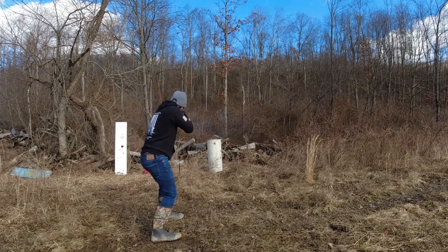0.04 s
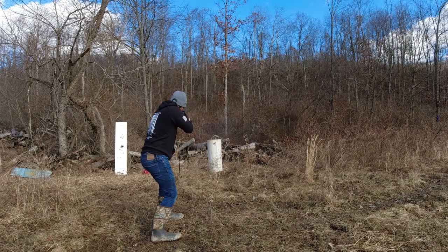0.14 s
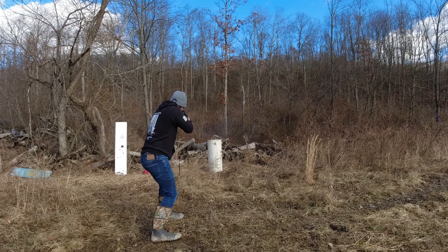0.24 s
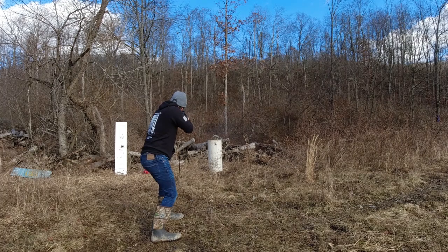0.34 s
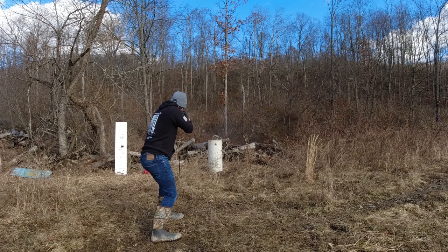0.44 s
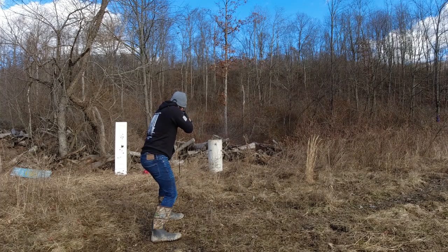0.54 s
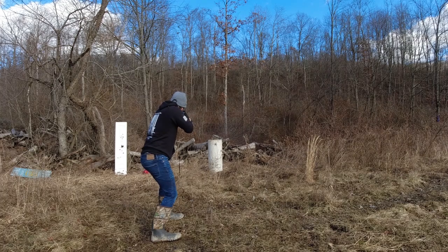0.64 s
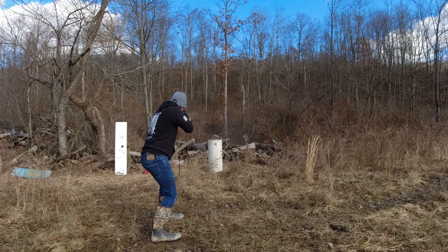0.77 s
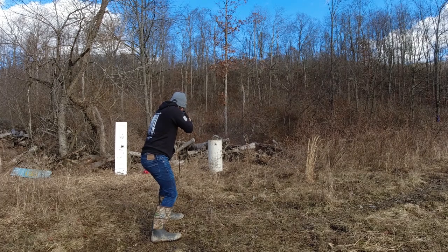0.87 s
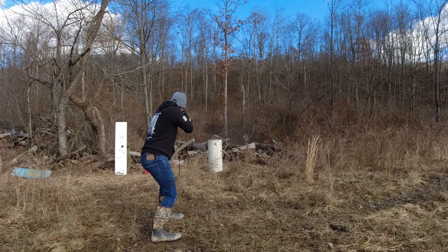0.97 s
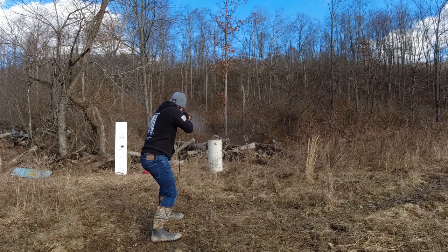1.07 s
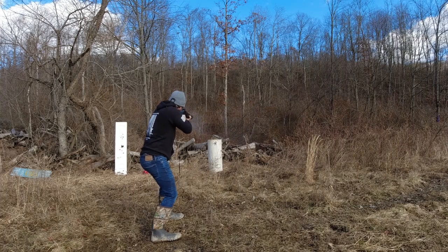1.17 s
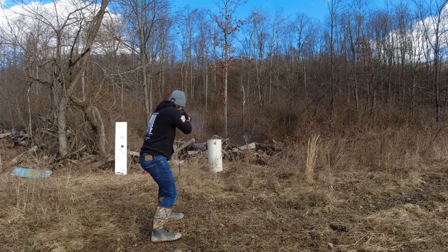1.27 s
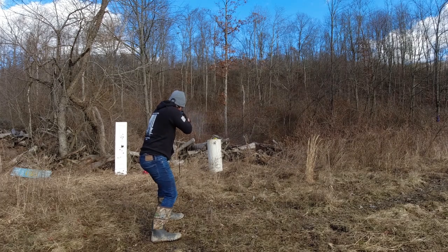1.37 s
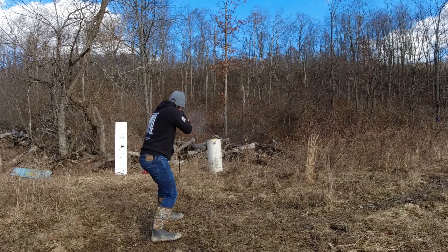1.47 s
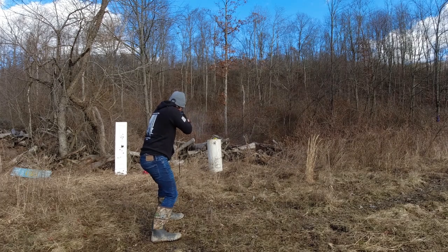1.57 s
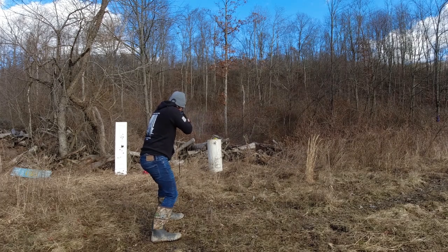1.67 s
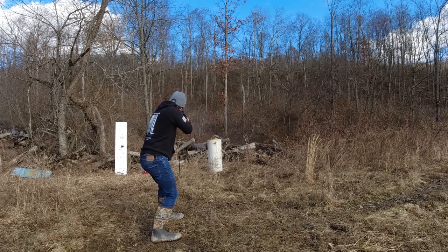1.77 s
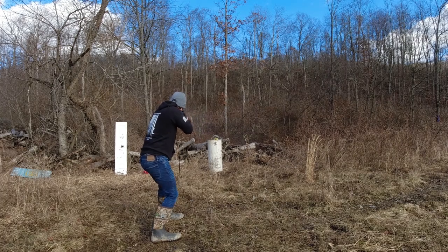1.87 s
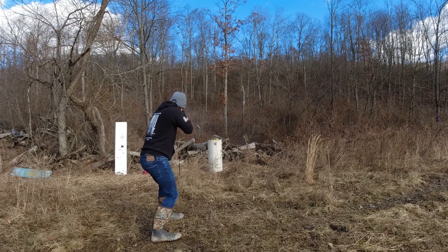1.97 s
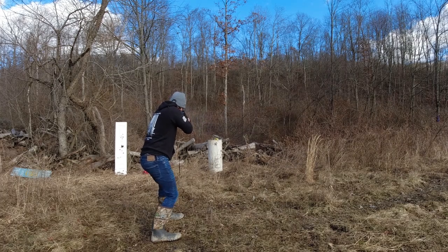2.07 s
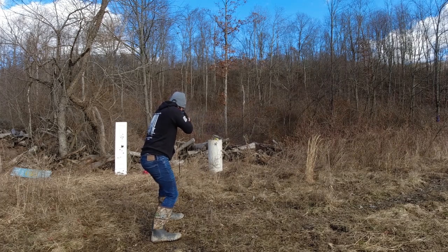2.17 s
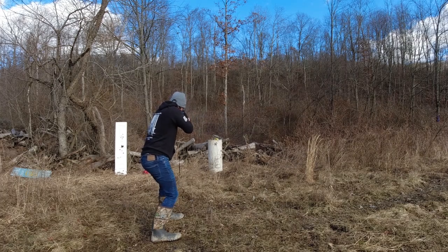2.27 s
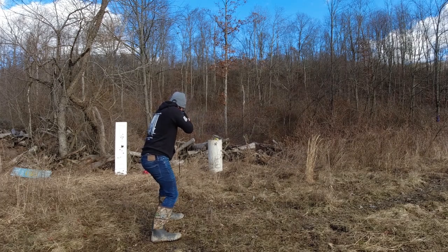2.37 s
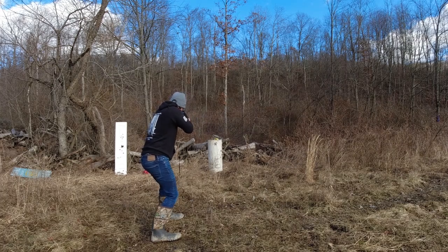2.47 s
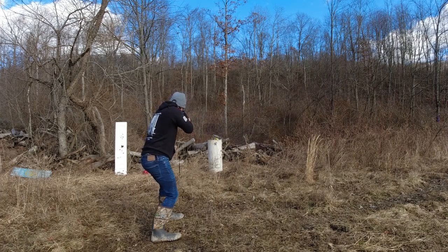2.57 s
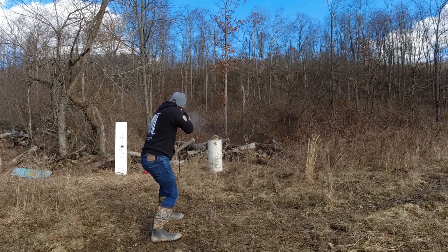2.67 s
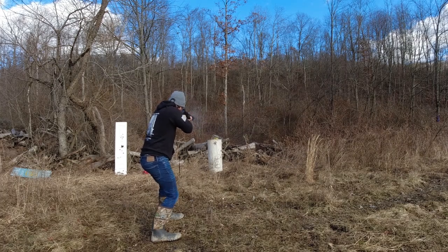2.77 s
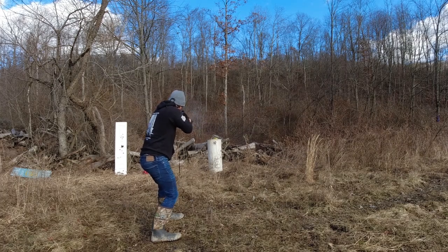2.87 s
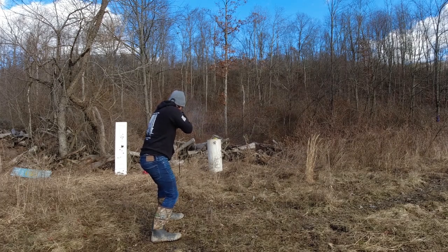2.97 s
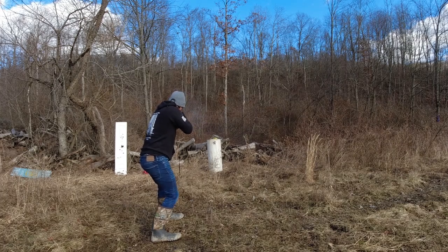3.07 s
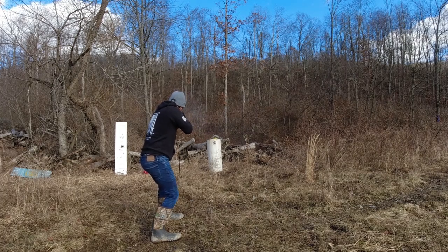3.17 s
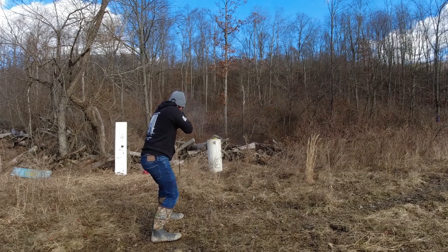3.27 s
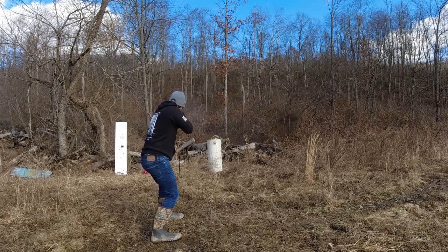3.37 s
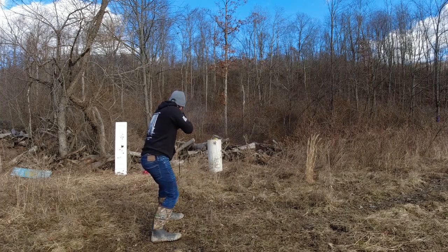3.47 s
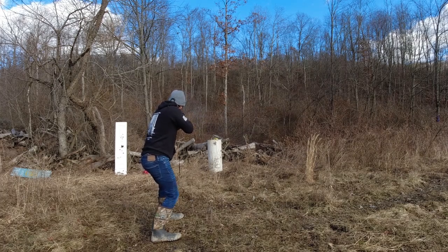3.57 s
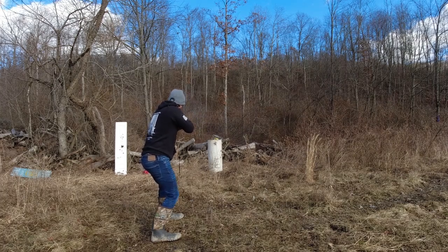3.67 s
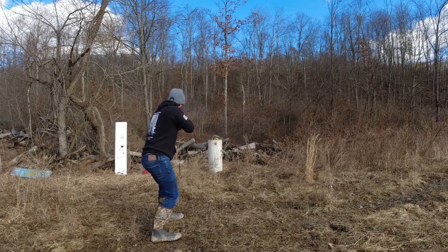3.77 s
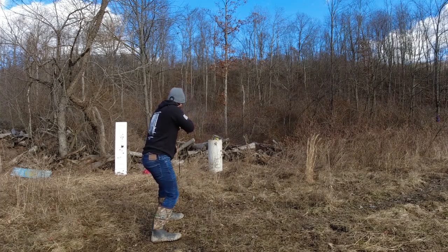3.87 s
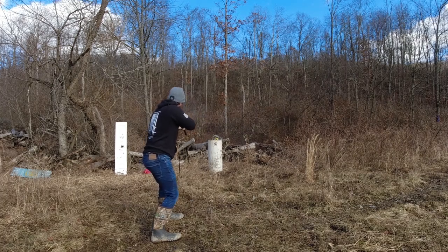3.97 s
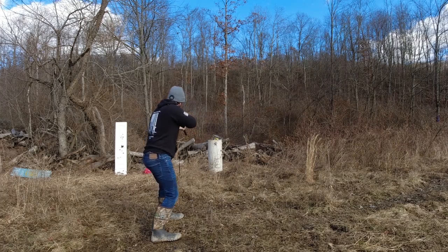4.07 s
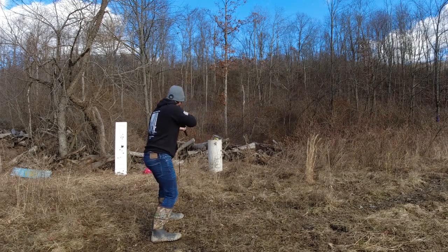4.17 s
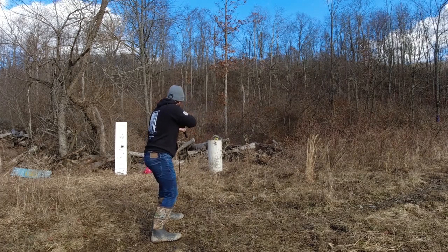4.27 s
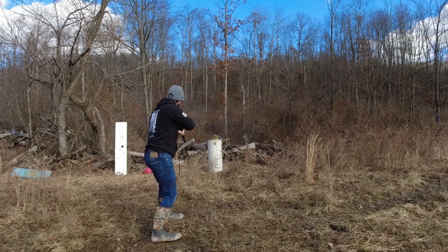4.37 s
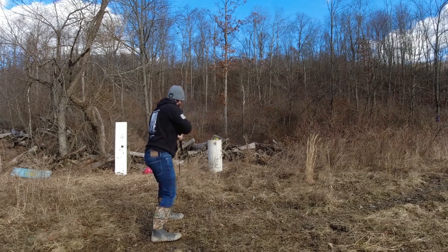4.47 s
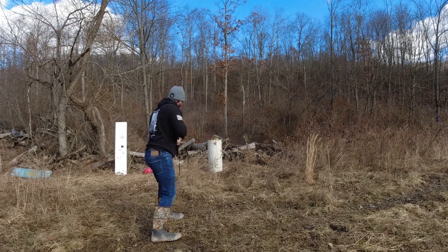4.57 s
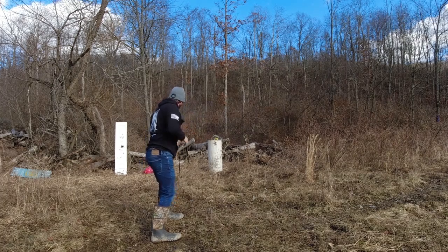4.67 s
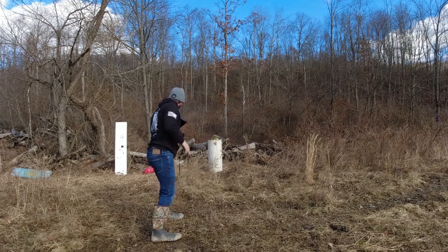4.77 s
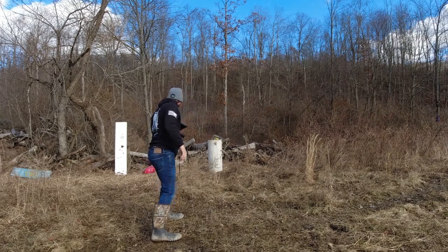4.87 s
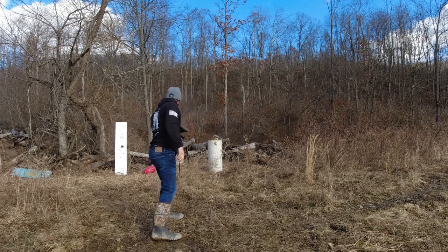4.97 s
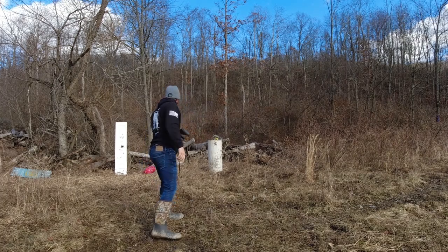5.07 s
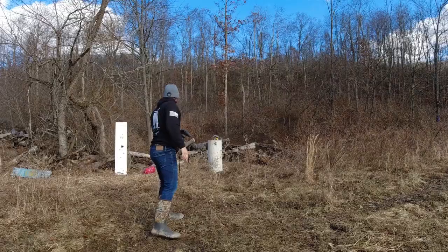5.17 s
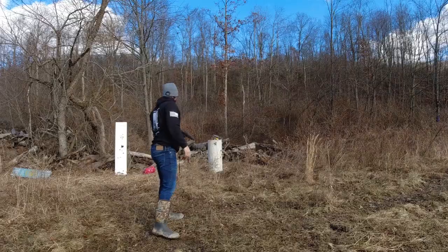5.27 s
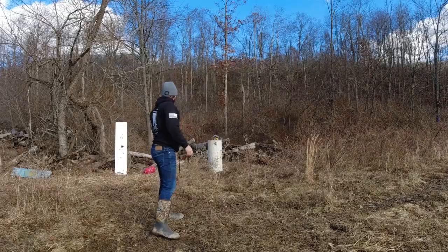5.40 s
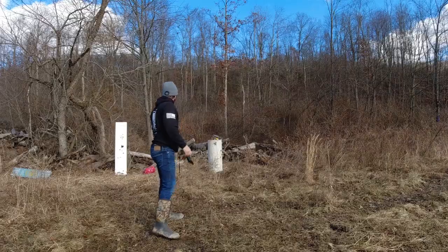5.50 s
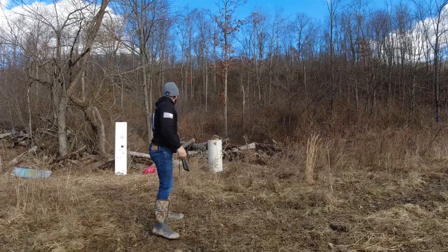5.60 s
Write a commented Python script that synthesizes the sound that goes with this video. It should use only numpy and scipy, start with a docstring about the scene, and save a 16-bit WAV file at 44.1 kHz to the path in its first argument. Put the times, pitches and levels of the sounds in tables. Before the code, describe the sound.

A pump-action shotgun is racked and fired twice outdoors, each boom rolling off the woods, then the slide is pulled open.

```python
"""A clearing faces a wooded bank; a pump-action shotgun is fired, its first shot already rolling away.
Each blast is a shock front and a low boom that overload the microphone. Targets and trunks reflect it
as distinct slaps, and the wood scatters it into a dying wash. The slide is racked between shots and
pulled open after the last: impact and friction excite the resonances of receiver and barrel.
Underneath lie the shooter's soft footfalls, a far engine, a faint hum and the hush of the open air."""
import sys
import numpy as np
from scipy import signal
from scipy.fft import rfft, irfft, next_fast_len
from scipy.io import wavfile
from scipy.ndimage import uniform_filter1d

SR = 44100
rng = np.random.default_rng(int(sys.argv[2]) if len(sys.argv) > 2 else 0)


def pcm_store(signal):
    """Save signal as 16-bit PCM."""
    levels = np.round(np.clip(np.atleast_2d(signal), -1, 1) * 32767)
    wavfile.write(sys.argv[1], SR, levels.astype(np.int16).T)


N = 248721
TIME = np.arange(N) / SR
AGE = TIME[:round(1.2 * SR)]   # time since the onset of one event

# left-right coherence of diffuse and of direct sound: (f/Hz, correlation)
FAR_COHERENCE = [(130, 0.99), (290, .99), (640, 0.95), (1400, 0.74), (3100, 0.32), (6800, .1),
                 (15000, 0.22)]
NEAR_COHERENCE = [(130, 1), (640, 0.95), (1400, .86), (3100, 0.56), (6800, 0.13), (15000, .15)]
# spectra of the outdoor hush and rumble: (f/Hz, relative density/dB)
HUSH_SPECTRUM = [(60, -29), (120, -5.5), (200, -4), (290, -4.5), (450, -6), (800, -5), (1100, -9),
                 (1600, -17.5), (2200, -27.5), (3500, -42), (6000, -54), (10000, -57), (16000, -69)]
RUMBLE_SPECTRUM = [(12, -4.5), (28, -4), (48, -13), (95, -8), (150, -19.5), (400, -59.5)]
# load on the far engine: (t/s, load from 0 to 1)
ENGINE_LOAD = [(0, 0), (2.4, .55), (3.6, .2), (4.3, .66), (4.7, .72), (5.35, 1)]
# thuds as the shooter shifts his weight: (t/s, level/dB, f/Hz)
THUDS = [(1.153, -45, 109), (2.719, -44, 104), (4.377, -39.5, 101)]

# hands and sleeves brush the lowered gun: (t of peak/s, level/dB, swell and decay time/s)
HANDLING = [(4.515, -80, .016), (4.73, -85, .014), (5.34, -79, .04)]
# a loose part clicks: (t/s, level/dB, rattle time/s, low-mode weight/dB)
LOOSE_PART_TICK = (4.4625, -66, .004, -4)
# slide pulled back: (t of rear stop/s, level/dB, relative level of the tumbling shell/dB)
PULLS = [(0.4194, -23, -13), (1.9684, -23.3, -19), (3.9587, -21.3, -40)]
# slide pushed home: (t of front stop/s, level/dB)
PUSHES = [(0.6564, -26.3), (2.223, -24.3)]
# contacts in a stroke: (t from the stop/s, relative level/dB, rattle time/s, low-mode weight/dB)
PULL_CONTACTS = [(-.0355, -15.5, .0052, -13), (-.0063, -17, .004, 1), (0, 0, .0046, -3),
                 (.0125, -17.5, .004, -2)]   # bolt unlocks, ejector trips, rear stop, rebound
PUSH_CONTACTS = [(-.094, -21, .009, -3), (-.0467, -15, .007, -8), (-.0075, -6.5, .0034, -8),
                 (0, 0, .004, -6.5)]   # lifter rises, shell meets chamber, bolt closes, front stop
# friction as the slide speeds towards a stop: (relative level/dB, swell time/s, decay time/s)
PULL_RUB = (-17, .017, .005)
PUSH_RUB = (-17, .028, .008)
# normal modes of receiver and barrel: (f/Hz, bandwidth/Hz, level/dB)
GUN_MODES = [(310, 42, -6), (464, 74, -5.5), (900, 68, 1), (1220, 113, -.5), (1504, 106, -2),
             (1798, 100, -1.5), (2277, 160, .3), (2746, 133, -1), (2940, 130, -2), (3160, 220, -1.5),
             (4030, 730, -14.5), (4600, 130, -8.5), (5240, 1100, -17.5), (8000, 2200, -19.5),
             (10660, 1500, -16), (14000, 2500, -25)]
# spectrum of their scatter from nearby brush: (f/Hz, relative density/dB)
BRUSH_SPECTRUM = [(200, 0.5), (900, 0), (3200, -4), (5000, -7.5), (7000, -9), (10500, -8.5), (16000, -16)]

# dense stands of brush and trees that return the blast: (delay/s, level/dB)
THICKETS = [(.06, -13), (.12, -17)]
# ground, targets and trunks that answer every shot alike: (delay/s, level/dB, decay time/s)
REFLECTORS = [(.029, -3.5, .0036), (.0455, -5.5, .005), (.0545, -7.5, .012), (.1015, -9.5, .0026),
              (.1149, -5, .004), (.122, -4, .0022), (.127, -12, .004), (.138, -13, .0045),
              (.158, -16, .002), (.2045, -16, .0016), (.223, -17, .0018), (.2437, -23, .0026),
              (.331, -30, .004)]
# spectra of the parts of a shot: (f/Hz, relative density/dB)
WOODS_SPECTRUM = [(25, -20), (70, -7.5), (140, -4.5), (280, -4), (480, -2), (750, 2), (1000, 1.5),
                  (1350, -6), (2000, -6.5), (3100, -11), (4000, -17.5), (6800, -25.5), (10500, -19),
                  (16000, -28)]
SLAP_SPECTRUM = [(40, -12), (200, 3), (500, -2), (750, -2), (1020, 4), (1450, -6.5), (2000, -5.5),
                 (2550, -11), (3200, -5), (4000, -20.5), (7000, -29.5), (11000, -31.5), (16000, -35)]
SIZZLE_SPECTRUM = [(40, -7.5), (150, -6.5), (300, -2), (1000, -2.5), (2200, 4.5), (3400, 1.5), (5000, -5),
                   (7500, -10.5), (11000, -5.5), (16000, -14.5)]
CRACK_SPECTRUM = [(60, -33), (300, -19.5), (600, -10), (950, 0), (1900, -1.5), (3200, -6.5), (4500, -15.5),
                  (7000, -25), (11000, -17), (16000, -21)]
# the overloaded microphone swings back to rest: (t/s, amplitude, first half swing/s, decay time/s)
RECOVERY_SWINGS = [(1.232, 0.87, .039, 0.11), (2.846, -0.28, .02, .028)]
# shots: (t/s, crack level/dB, sizzle level/dB, sizzle decay time/s, boom level/dB, woods level/dB)
SHOTS = [(-0.29, -10, -17, .065, 0, 2.3), (1.2023, -5.5, -15.5, 0.075, 0, 2.3),
         (2.8139, -6, -18, 0.08, -1.5, 1.5)]


def from_db(db):
    """Amplitude ratio of a level in decibels."""
    return 10 ** (np.asarray(db) / 20)


def unit_rms(x):
    """Normalisation to unit power."""
    return x / np.sqrt(np.mean(x ** 2) + 1e-20)


def at_hz(table, hz):
    """Interpolation of a table on a log-frequency axis."""
    f, value = np.transpose(table)
    return np.interp(np.log(np.maximum(hz, 1)), np.log(f), value)


def add(out, sound, onset):
    """Superposition of a sound at an onset in seconds, which may be negative."""
    at = round(onset * SR)
    first, last = max(at, 0), min(at + sound.shape[-1], N)
    out[..., first:last] += sound[..., first - at:last - at]


def coloured(x, spectrum):
    """Minimum-phase (causal) filtering that conserves the power of white noise."""
    size = 2 * next_fast_len(x.shape[-1])
    gain = unit_rms(from_db(at_hz(spectrum, np.linspace(0, SR / 2, size // 2 + 1))))
    cepstrum = irfft(np.log(gain))[:size // 2]
    cepstrum[1:] *= 2
    return irfft(rfft(x, size) * np.exp(rfft(cepstrum, size)))[..., :x.shape[-1]]


def stereo(pair, coherence):
    """Partial coherence: two independent signals mix to channels alike in bass, apart in treble."""
    size = 2 * next_fast_len(pair.shape[-1] // 2 + 1)
    mid, side = rfft(pair, size)
    alike = np.clip(at_hz(coherence, np.linspace(0, SR / 2, len(mid))), -.999, .999)
    channels = np.sqrt((1 + alike) / 2) * mid + np.sqrt((1 - alike) / 2) * side * [[1], [-1]]
    return irfft(channels)[:, :pair.shape[-1]]


def noise(spectrum, coherence, size):
    """Stationary stereo noise of a given spectrum."""
    return coloured(stereo(rng.standard_normal((2, size)), coherence), spectrum)


def fluctuation(size, window):
    """Random drift of unit power: a moving average of noise over a window of samples."""
    return unit_rms(uniform_filter1d(rng.standard_normal(size), size=window))


def swell_and_fade(t, swell, fade):
    """Exponential growth to 1 at t = 0, then exponential decay."""
    return np.exp(-np.maximum(-t / swell, t / fade))


def bursts(events, rise_s):
    """Incoherent addition: the envelopes of events (t/s, level/dB, decay time/s) sum in power."""
    power, t = np.zeros(N), AGE[:SR // 8]
    for onset, db, decay in events:
        add(power, (from_db(db) * (1 - np.exp(-t / rise_s)) * np.exp(-t / decay)) ** 2, onset)
    return np.sqrt(power)


def pulses(events, gain_db, edge_hz, order):
    """Band-limited impulses: one at the onset of each event, blunted by a low-pass."""
    train = np.zeros(N)
    for onset, db, _ in events:
        train[round(onset * SR)] = from_db(db + gain_db)
    return signal.sosfilt(signal.butter(order, edge_hz, fs=SR, output="sos"), train + 1e-18)


def resonance(x, hz, width_hz):
    """Forced response of a damped oscillator with unit peak gain."""
    r = np.exp(-np.pi * width_hz / SR)
    feedback = [1, -2 * r * np.cos(2 * np.pi * hz / SR), r * r]
    return signal.lfilter(np.array([1, 0, -1]) * (1 - r * r) / 2, feedback, x + 1e-18)


def drone(hz, db, octave_db, waver):
    """Slight random frequency modulation of a tone and its octave."""
    phase = 2 * np.pi * np.cumsum(hz * (1 + waver * fluctuation(N, window=3000))) / SR
    return np.sqrt(2) * from_db(db) * (np.sin(phase) + from_db(octave_db) * np.sin(2 * phase))


def open_air(hush_db=-60, rumble_db=-60, hum_hz=270, hum_db=-64.5, hum_fade_db_per_s=2.1):
    """Ambient noise: a steady hush and rumble, with a distant hum that slowly fades."""
    hum = drone(hum_hz, hum_db - hum_fade_db_per_s * TIME, octave_db=-20, waver=.018)
    hush = from_db(hush_db) * noise(HUSH_SPECTRUM, FAR_COHERENCE, N)
    rumble = from_db(rumble_db) * noise(RUMBLE_SPECTRUM, FAR_COHERENCE, N)
    return hum + hush + rumble


def far_engine(idle_hz=76.2, sag_hz=3.5, idle_db=-67, load_db=16.7):
    """A periodic source that grows louder and slower under load."""
    load = np.interp(TIME, *np.transpose(ENGINE_LOAD))
    return drone(idle_hz - sag_hz * load, idle_db + load_db * load, octave_db=-19, waver=.015)


def footfalls(swell_s=.006, scuff_db=8, scuff_hz=290, scuff_width_hz=180):
    """Heavily damped impacts on soft ground: each a low knock with a dull scuff."""
    out = np.zeros(N)
    envelope = AGE / swell_s * np.exp(1 - AGE / swell_s)
    for onset, db, hz in THUDS:
        scuff = resonance(rng.standard_normal(len(AGE)), scuff_hz, scuff_width_hz)
        scuff = from_db(scuff_db) * resonance(scuff, scuff_hz, scuff_width_hz)
        add(out, from_db(db) * envelope * (np.sin(2 * np.pi * hz * AGE) + scuff), onset)
    return out


def slide_motion(shell_delay_s=.028, shell_rattle_s=.011, shell_weight_db=2.5):
    """Impact and sliding friction: the contacts and the rub envelope of racking and handling."""
    # the empty shell knocks its way out of the port
    contacts = [(stop + shell_delay_s, db + shell_db, shell_rattle_s, shell_weight_db)
                for stop, db, shell_db in PULLS]
    friction = sum(from_db(db) * swell_and_fade(TIME - peak, span, span) for peak, db, span in HANDLING)
    for strokes, run, rub in (PULLS, PULL_CONTACTS, PULL_RUB), (PUSHES, PUSH_CONTACTS, PUSH_RUB):
        rub_db, swell, fade = rub
        for stop, db, *_ in strokes:
            for offset, contact_db, rattle, weight in run:
                contacts.append((stop + offset, db + contact_db, rattle, weight))
            friction += from_db(db + rub_db) * swell_and_fade(TIME - stop, swell, fade)
    return contacts + [LOOSE_PART_TICK], friction


def contact_force(contacts, friction, chatter, rattle_db=15):
    """Impulsive and random excitation: each contact strikes and rattles on, and friction adds noise."""
    strikes = pulses(contacts, gain_db=33, edge_hz=4200, order=3)
    rattle = from_db(rattle_db) * bursts(contacts, rise_s=.00092)
    return strikes + np.hypot(rattle, friction) * chatter


def brush_scatter(force, t60_s=.32):
    """Reverberation: the brush around the shooter returns a short bright tail, here of unit power."""
    response = noise(BRUSH_SPECTRUM, FAR_COHERENCE, len(AGE)) * np.exp(-np.log(1000) * AGE / t60_s)
    return unit_rms(signal.fftconvolve(force[:1], response, axes=1)[:, :N])


def pump_action(rub_db=14, rub_weight_db=-9, grain_db=3, low_modes_below_hz=1600, scatter_db=-14):
    """Modal vibration of receiver and barrel; each contact shakes the low modes by a weight of its own."""
    contacts, friction = slide_motion()
    rub = from_db(rub_db) * friction
    grains = rng.standard_normal((2, N)) * from_db(grain_db * rng.standard_normal(N))
    chatter = stereo(unit_rms(grains), NEAR_COHERENCE)
    high_contacts = [(t, db, rattle) for t, db, rattle, _ in contacts]
    low_contacts = [(t, db + weight, rattle) for t, db, rattle, weight in contacts]
    high_force = contact_force(high_contacts, rub, chatter)
    low_force = contact_force(low_contacts, from_db(rub_weight_db) * rub, chatter)
    direct = np.zeros((2, N))
    for k, (hz, width, db) in enumerate(GUN_MODES):
        force = low_force if hz < low_modes_below_hz else high_force
        direct += (-1) ** k * from_db(db) * resonance(force, hz, width)
    return direct + from_db(scatter_db) * np.std(direct) * brush_scatter(high_force)


def woods_envelope(wood_db=-21, build_s=.06, thinning_db_per_s=21, edge_s=.45, past_edge_db_per_s=39):
    """Delay grows with range: thickets answer first, then the wood, dying quickly past its far edge."""
    thickets = sum(from_db(db) * swell_and_fade(AGE - delay, .012, .018) for delay, db in THICKETS)
    depth_db = wood_db - thinning_db_per_s * AGE - past_edge_db_per_s * np.maximum(AGE - edge_s, 0)
    return np.hypot(thickets, from_db(depth_db) * (1 - np.exp(-AGE / build_s)))


def woods(trunks_per_s=700, trunk_share=.3, air_db_per_s_khz=6, clump_db=2.5):
    """Scattering and air absorption: trunks return shocks, twigs a wash; long paths lose treble."""
    shape = (2, len(AGE))
    trunks = unit_rms(rng.standard_normal(shape) * (rng.random(shape) < trunks_per_s / SR))
    twigs = rng.standard_normal(shape)
    returns = np.sqrt(trunk_share) * trunks + np.sqrt(1 - trunk_share) * twigs
    wash = coloured(stereo(returns, FAR_COHERENCE), WOODS_SPECTRUM)
    hz, age, frames = signal.stft(wash, SR, nperseg=512)
    # each clump of trees answers with a colour of its own
    clumps = uniform_filter1d(rng.standard_normal(frames.shape[1:]), size=3, axis=0)
    clumps = unit_rms(uniform_filter1d(clumps, size=7, axis=1))
    colour = unit_rms(from_db(clump_db * clumps))
    absorption = from_db(-air_db_per_s_khz * hz[:, None] / 1000 * age)
    return signal.istft(frames * colour * absorption)[1][:, :len(AGE)] * woods_envelope()


def slaps(scatter_db=-2):
    """Specular reflection: a hard surface returns one blunted shock, trailed by scatter around it."""
    echoes = [(onset + delay, db, decay)
              for onset, *_ in SHOTS for delay, db, decay in REFLECTORS if onset + delay > 0]
    shocks = pulses(echoes, gain_db=17, edge_hz=3500, order=6)
    scatter = stereo(rng.standard_normal((2, N)), NEAR_COHERENCE) * bursts(echoes, rise_s=.00073)
    return coloured(shocks + from_db(scatter_db) * scatter, SLAP_SPECTRUM)


def bank_boom(start_hz=250, end_hz=142, sink_at_s=.073, sink_s=.004, wander=.23, left_lead_rad=.13,
              peak_s=.068, rise_db_per_s=580, fall_db_per_s=1200, roll_db=-18, roll_decay_s=.048):
    """Low-frequency echo of the bank: unsteady cycles swell, sink in pitch and fall to a soft roll."""
    hz = end_hz + (start_hz - end_hz) * (1 - np.tanh((AGE - sink_at_s) / sink_s)) / 2
    phase = 2 * np.pi * np.cumsum(hz * (1 + wander * fluctuation(len(AGE), window=100))) / SR
    before, after = np.maximum(peak_s - AGE, 0), np.maximum(AGE - peak_s, 0)
    swell = from_db(-rise_db_per_s * before - fall_db_per_s * after)
    roll = from_db(roll_db - rise_db_per_s * before) * np.exp(-after / roll_decay_s)
    return np.sin(phase + np.array([[left_lead_rad], [0]])) * np.hypot(swell, roll)


def microphone_recovery(right_db=.5, right_lag_s=.0017, creep_share=.12):
    """Relaxation of two overloaded capsules: each slow half swing lasts twice as long as the last."""
    out = np.zeros((2, N))
    for onset, amplitude, half_swing, decay in RECOVERY_SWINGS:
        settling = (1 - creep_share) * np.exp(-(AGE / decay) ** 3)
        creep = creep_share * np.exp(-AGE / (2 * decay))
        swing = amplitude * np.sin(np.pi * np.log2(1 + AGE / half_swing)) * (settling + creep)
        add(out[0], swing, onset)
        add(out[1], from_db(right_db) * swing, onset + right_lag_s)
    return out


def muzzle_blast(crack_db, sizzle_db, sizzle_s, crack_s=.0068, rise_s=.0022, grain_db=.5):
    """A shock front is heard as a hard crack; a bright, spitting sizzle of overload follows it."""
    crack = np.exp(-(AGE / crack_s) ** 4) * noise(CRACK_SPECTRUM, NEAR_COHERENCE, len(AGE))
    spit = unit_rms(from_db(grain_db * fluctuation(len(AGE), window=60)))
    sizzle = np.exp(-AGE / sizzle_s) * spit * noise(SIZZLE_SPECTRUM, FAR_COHERENCE, len(AGE))
    front = 1 - np.exp(-(AGE / rise_s) ** 2)
    return (from_db(crack_db) * crack + from_db(sizzle_db) * sizzle) * front


def gunfire():
    """Multipath propagation: each shot arrives directly, then from reflectors, bank and woods."""
    out = slaps()
    for onset, crack_db, sizzle_db, sizzle_s, boom_db, woods_db in SHOTS:
        direct = muzzle_blast(crack_db, sizzle_db, sizzle_s)
        add(out, direct + from_db(boom_db) * bank_boom() + from_db(woods_db) * woods(), onset)
    return out


def scene():
    """Linear superposition of all sources and the microphone's recovery swings."""
    return gunfire() + microphone_recovery() + pump_action() + footfalls() + far_engine() + open_air()


def record(dry, ceiling=.8, cutoff_hz=16000):
    """Saturation squashes the blasts, and a steep low-pass cuts the top."""
    squashed = ceiling * np.tanh(dry / ceiling)
    return signal.sosfilt(signal.ellip(10, .2, 80, cutoff_hz, fs=SR, output="sos"), squashed)


dry = scene()
out = record(dry)
pcm_store(out)
```